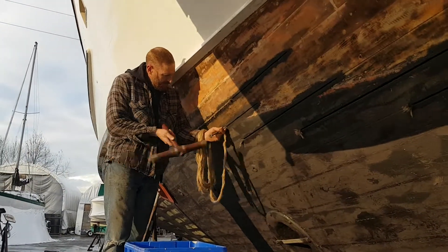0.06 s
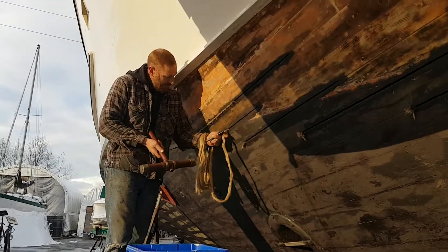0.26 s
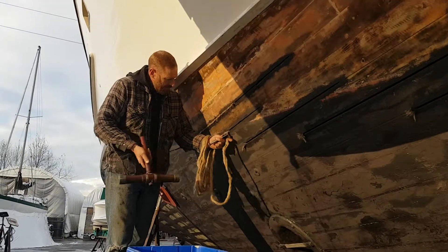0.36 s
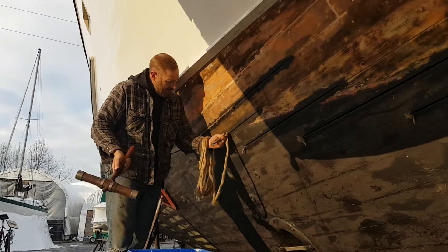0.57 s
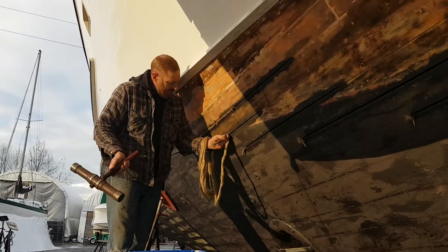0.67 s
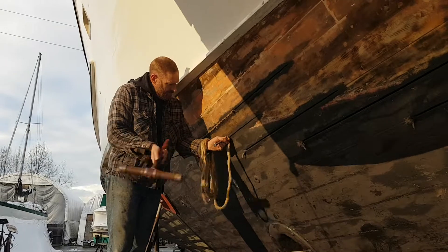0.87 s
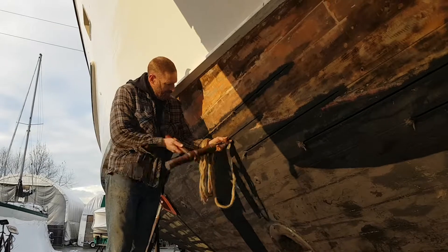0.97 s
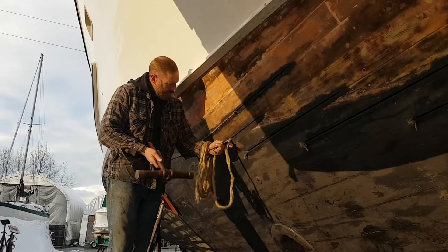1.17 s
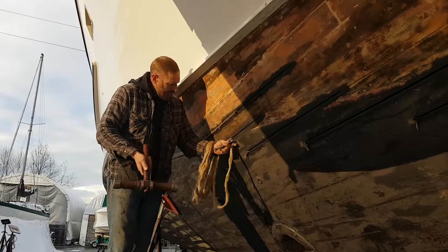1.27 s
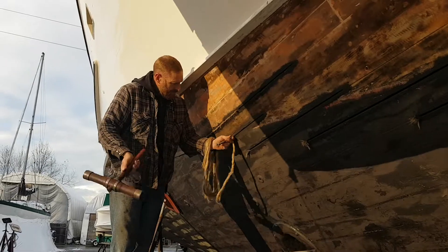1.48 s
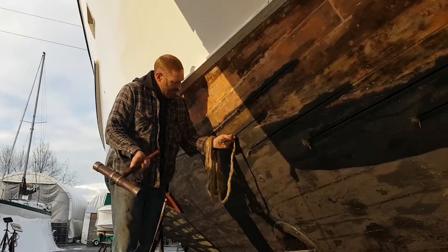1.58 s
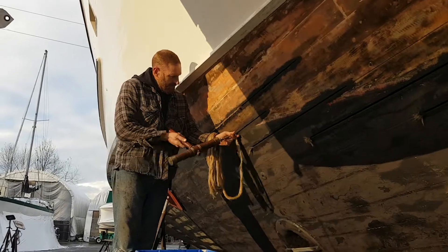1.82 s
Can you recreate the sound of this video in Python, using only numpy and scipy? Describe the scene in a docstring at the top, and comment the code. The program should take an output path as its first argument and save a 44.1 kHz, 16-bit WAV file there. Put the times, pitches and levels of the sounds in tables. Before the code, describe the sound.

Three mallet blows drive an iron into a wooden hull in an open boatyard. Each follows a soft sleeve swish and lands with a slightly overloaded clack, a short metallic ring and a low thud. Tools tap lightly in between.

```python
"""Caulking a wooden hull

In an open boatyard a wooden mallet drives a caulking iron into a seam: two full blows, and a third
that lands just as the sound ends. Each swing swishes a sleeve; the blow rings mallet and iron, booms
in the planking and scatters between hull and ground. A far wall answers, the tools knock lightly
between blows, and the hits overload the input stage."""
import sys
import numpy as np
from scipy import signal
from scipy.fft import rfft, irfft
from scipy.io import wavfile

SR = 44100
rng = np.random.default_rng(int(sys.argv[2]) if len(sys.argv) > 2 else 0)


def generate_wav(signal):
    """Clip the signal to [-1, 1] and save it as 16-bit WAV at the path in sys.argv[1]."""
    frames = np.transpose(np.atleast_2d(signal))
    scaled = np.clip(frames, -1, 1) * 32767
    pcm = np.round(scaled).astype(np.int16)
    wavfile.write(sys.argv[1], SR, pcm)


N = 81585
TIME_S = np.arange(N) / SR


def undb(db):
    return 10 ** (np.asarray(db) / 20)


def curve_at(points, hz):
    """Read a curve on a log frequency axis."""
    freqs, values = np.array(points).T
    return np.interp(np.log(hz + 1), np.log(freqs), values)


# Likeness of left and right: freq_hz, correlation
EAR_LIKENESS = [(150, 0.97), (350, 0.85), (700, 0.23), (1400, 0), (3500, 0.14), (12000, 0)]

def noise(spectrum, pan_db=0):
    """Coloured stereo noise with centred bass; a negative pan leans the treble right."""
    hz = np.fft.rfftfreq(N, 1 / SR)
    gain = undb(curve_at(spectrum, hz))
    alike = curve_at(EAR_LIKENESS, hz)
    mid, side = rfft(rng.standard_normal((2, N)))
    ears = np.array([[1], [-1]])
    stereo = mid * np.sqrt(1 + alike) + ears * side * np.sqrt(1 - alike)
    pan = undb(ears * pan_db / 2 * hz / (hz + 1000))
    return irfft(stereo * pan * gain, N) / np.sqrt(2 * np.mean(gain ** 2))


def flutter(depth_db, rate_hz):
    """A gain that wanders at random."""
    return undb(depth_db * np.interp(TIME_S * rate_hz, np.arange(N), rng.standard_normal(N)))


def fade(start, rise_s, t60_s):
    """A quick attack and an exponential decay."""
    age = np.maximum(TIME_S - start, 0)
    return (1 - np.exp(-age / rise_s)) * np.exp(-np.log(1000) * age / t60_s)


def ring(modes, start, rise_s=.0012):
    """Damped modes set going by one push, alternating in polarity."""
    out = np.zeros(N)
    for k, (hz, db, t60_s) in enumerate(modes):
        tone = np.sin(2 * np.pi * hz * (TIME_S - start))
        out += (-1) ** k * undb(db) * tone * fade(start, rise_s, t60_s)
    return out


def late(x, delay_s):
    return np.interp(TIME_S - delay_s, TIME_S, x, left=0)


# Colour of the outdoor bed: freq_hz, level_db
AIR_SPECTRUM = [(25, -18), (55, -12.5), (105, -1.5), (160, -5.5), (210, -4), (320, -13), (520, -12.5),
                (1150, -12.5), (1500, -16.5), (2200, -10), (3200, -19), (6200, -26), (8000, -25),
                (9500, -36), (13000, -38), (16000, -52)]

def outdoor_air():
    """A faint, gently wavering bed of open air."""
    return undb(-44) * noise(AIR_SPECTRUM, pan_db=-6.5) * flutter(depth_db=1, rate_hz=13.44)


# Colour of moving cloth: freq_hz, level_db
SLEEVE_SPECTRUM = [(40, -3.5), (110, 8.5), (300, 0.5), (600, -2), (1100, 1.5), (1500, -2.5), (2200, 4),
                   (3300, -5), (5500, -11.5), (6500, -16.5), (8000, -12), (9500, -21.5), (16000, -28.5)]

def sleeve_swish(hit_s):
    """The sleeve swells as the arm speeds up, peaking just ahead of the hit."""
    from_peak_s = TIME_S - (hit_s - .024)
    width_s = np.where(from_peak_s < 0, .092, .025)  # slow in, fast out
    swell = np.exp(-.5 * (from_peak_s / width_s) ** 2)
    cloth = noise(SLEEVE_SPECTRUM, pan_db=-4.5) * flutter(depth_db=.5, rate_hz=51.2)
    return undb(-33) * swell * cloth


# Colour of the contact: freq_hz, level_db
CRACK_SPECTRUM = [(100, -15), (500, -5.5), (900, 2), (2000, -2.5), (3700, 4.5), (5500, -10), (8000, -14),
                  (11000, -22.5), (16000, -28)]

def contact_crack(start):
    """Mallet meets iron in a short, bright burst."""
    return undb(-1.5) * noise(CRACK_SPECTRUM, pan_db=-3.5) * fade(start, rise_s=.00071, t60_s=.031)


# Modes of the mallet head and of the iron: pitch_hz, level_db, t60_s
MALLET_MODES = [(2077, -9, 0.12), (2145, -11, 0.094), (1800, -20, 0.27), (1400, -27.5, 0.21),
                (4920, -28.5, 0.18)]
IRON_MODES = [(1745, -23, .12), (2690, -22, .07), (2992, -20, .12), (3163, -22, .17), (3288, -22, .16),
              (3635, -19, .15), (3738, -14, .19), (3834, -20, .15), (4290, -24, .1), (5850, -33, .09),
              (7120, -34, .08)]

def tool_ring(modes, start):
    """A struck tool rings; higher modes lean right, and the left ear hears it later."""
    ears = []
    for db_per_khz, lag_s in [(-.45, .00003), (.3465, 0)]:
        tilted = [(hz, db + db_per_khz * hz / 1000, t60_s) for hz, db, t60_s in modes]
        ears.append(ring(tilted, start + lag_s))
    return np.array(ears)


# Modes of the wood around the seam: pitch_hz, level_db, t60_s
SEAM_MODES = [(477, -16, 0.09), (525, -17.5, 0.094), (638.5, -27, .12), (813, -13, 0.043),
              (1026, -17.5, 0.07), (1113, -15, 0.079)]

def seam_clack(start):
    """The wood clacks as the iron drives in."""
    return ring(SEAM_MODES, start)


# Modes of the planking: pitch_hz, level_db, t60_s
PLANK_MODES = [(105, -16, 0.25), (142.7, -4, 0.11), (191.4, -14.5, 0.081), (276.4, -33.5, 0.24)]

def hull_boom(start):
    """The planks take the blow and boom with a softer attack."""
    return ring(PLANK_MODES, start, rise_s=.0043)


# Colour of the close scatter: freq_hz, level_db
SCATTER_SPECTRUM = [(30, -25), (75, 6), (150, 8.5), (330, -4.5), (480, -1.5), (620, -5), (1100, 2),
                    (1500, -2), (2080, 7), (2500, -10.5), (3200, -1), (3800, 2.5), (4400, -9),
                    (5300, -17.5), (8000, -27.5), (10000, -40), (16000, -48)]

def hull_scatter(start):
    """The blow scatters between hull and ground in a short wash."""
    return undb(-12) * noise(SCATTER_SPECTRUM, pan_db=-4.5) * fade(start, rise_s=.0038, t60_s=.22)


# Colour of the yard's late ring: freq_hz, level_db
YARD_SPECTRUM = [(50, -1), (120, 13.5), (300, 0), (1000, -2.5), (2050, 2.5), (2600, -7.5), (3700, -6),
                 (5500, -21.5), (16000, -34.5)]

def yard_tail(start):
    """The yard rings on quietly after the blow."""
    return undb(-33) * noise(YARD_SPECTRUM, pan_db=-2.5) * fade(start, rise_s=.027, t60_s=.9)


# Bounces off ground, hull and far wall: delay_s, boom_db, strike_db
ECHO_TAPS = [(.0047, -1.5, -27), (.019, -12.5, -17), (.0292, -11, -24), (.047, -17.5, -21.5),
             (.056, -49, -17.5), (.176, -37, -30)]

def echoes(boom, strike):
    """Surfaces throw the blow back; the strike's echoes reach the left ear later."""
    out = np.zeros((2, N))
    for delay_s, boom_db, strike_db in ECHO_TAPS:
        bounce = np.array([late(strike[0], delay_s + .00034), late(strike[1], delay_s)])
        out += undb(boom_db) * late(boom, delay_s) + undb(strike_db) * bounce
    return out


# Taps between blows: start_s, level_db, tick_db
KNOCK_CUES = [(.459, -43, 3), (0.552, -35, -12), (1.3737, -26, -20)]
# Modes of a tap: pitch_hz, level_db, t60_s
KNOCK_MODES = [(162, -3.5, .12), (500, -1.5, .06), (690, -6, 0.022), (860, -4, 0.026), (1074, -10.5, 0.056)]

def tool_knocks():
    """Dull taps with a small tick as the tools are shifted."""
    out = np.zeros((2, N))
    for start, level_db, tick_db in KNOCK_CUES:
        tick = undb(tick_db) * noise(CRACK_SPECTRUM) * fade(start, rise_s=.00042, t60_s=.038)
        out += undb(level_db) * (ring(KNOCK_MODES, start, rise_s=.00026) + tick)
    return out


# Mix of each blow: start_s, hull_db, mallet_db, iron_db, seam_db, crack_db, reverb_db, swish_db
BLOW_CUES = [(0.2014, 1.4, 0, -4.5, 4.5, -1.5, 4.5, 0.5), (1.054, 1.5, -6, 0, -1, -4.5, 4.5, -1.5),
             (1.8487, -1, 3, 6, -8, -2, -4, -1.5)]

def scene():
    """Swings, blows and their reflections over the air, with knocks in between."""
    mix = outdoor_air()
    for start, hull_db, mallet_db, iron_db, seam_db, crack_db, reverb_db, swish_db in BLOW_CUES:
        mix += undb(swish_db) * sleeve_swish(start)
        strike = undb(crack_db) * contact_crack(start)
        strike += undb(mallet_db) * tool_ring(MALLET_MODES, start)
        strike += undb(iron_db) * tool_ring(IRON_MODES, start)
        strike += undb(seam_db) * seam_clack(start)
        boom = undb(hull_db) * hull_boom(start)
        reverb = undb(reverb_db) * (hull_scatter(start) + yard_tail(start))
        mix += strike + boom + reverb + echoes(boom, strike)
    return mix + tool_knocks()


def record(dry):
    """The input stage thins the deepest bass, flattens the peaks and cuts the top."""
    low_cut_hz, drive_db, high_cut_hz = 24, .5, 16000
    low_cut = signal.butter(1, low_cut_hz, "high", fs=SR, output="sos")
    high_cut = signal.ellip(8, .2, 80, high_cut_hz, fs=SR, output="sos")
    driven = undb(drive_db) * signal.sosfilt(low_cut, dry)
    clipped = driven / (1 + driven ** 6) ** (1 / 6)
    return signal.sosfilt(high_cut, clipped)


dry = scene()
out = record(dry)
generate_wav(out)
```